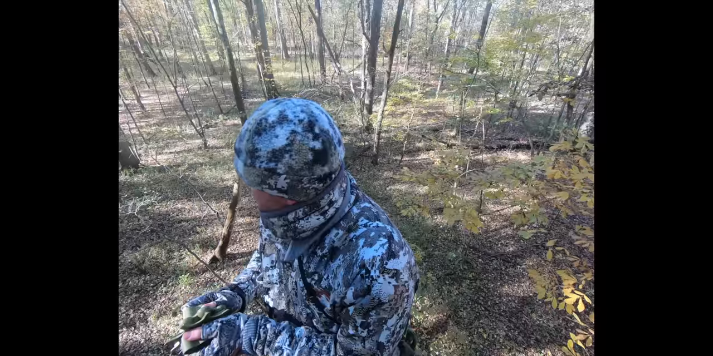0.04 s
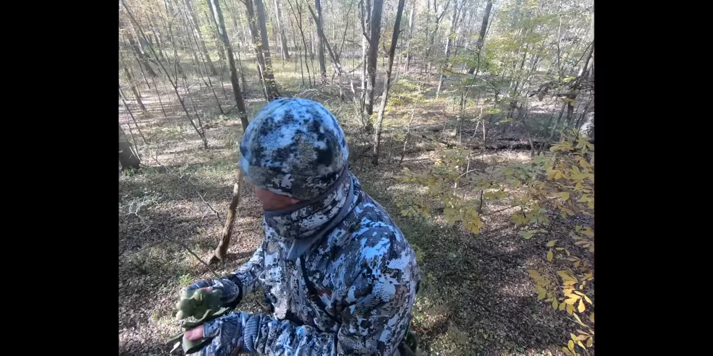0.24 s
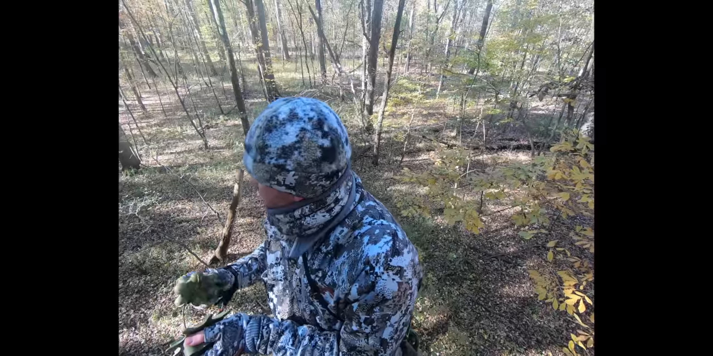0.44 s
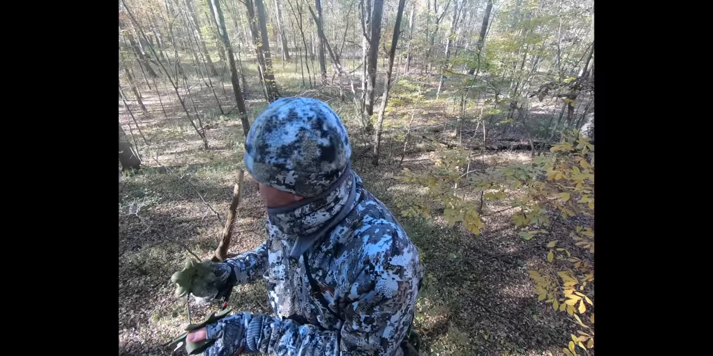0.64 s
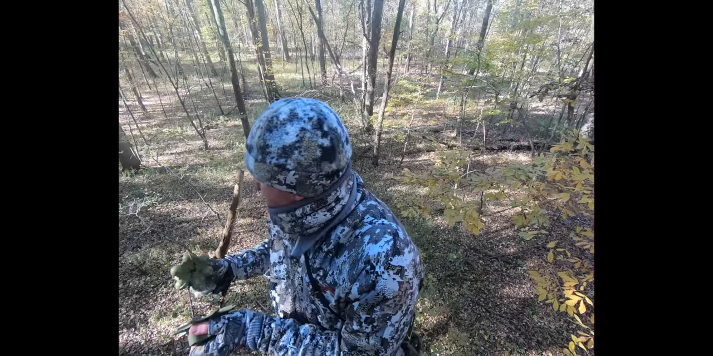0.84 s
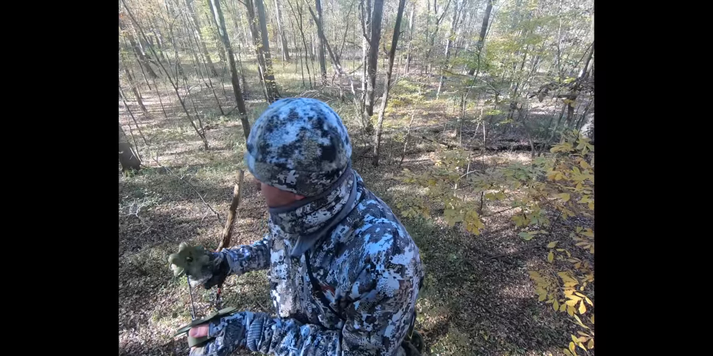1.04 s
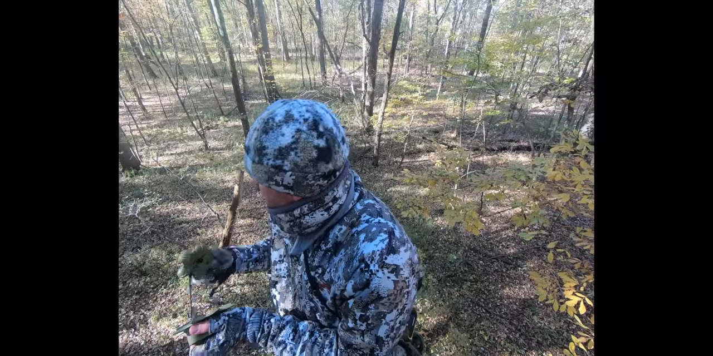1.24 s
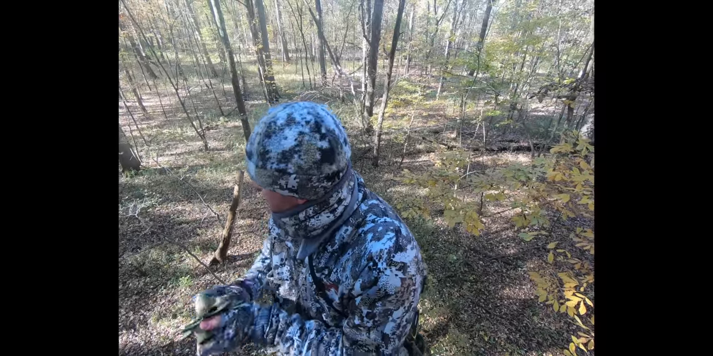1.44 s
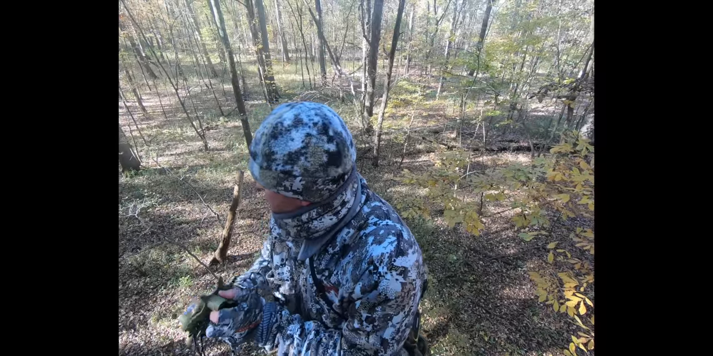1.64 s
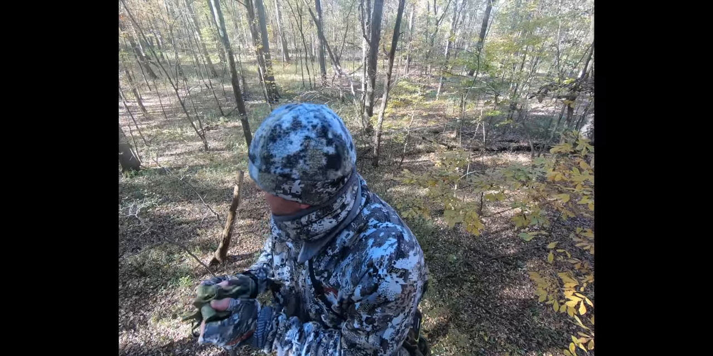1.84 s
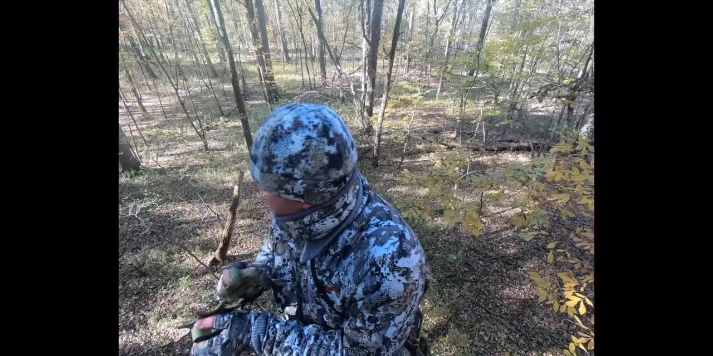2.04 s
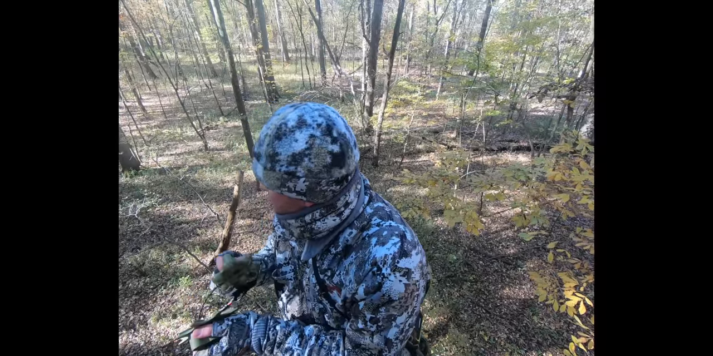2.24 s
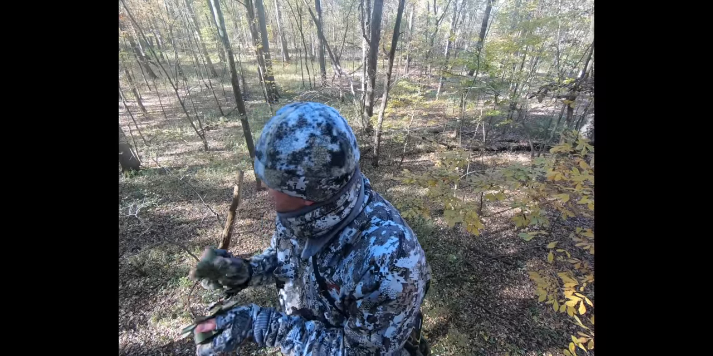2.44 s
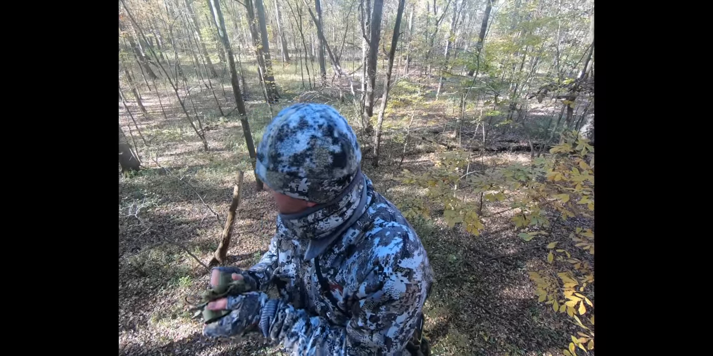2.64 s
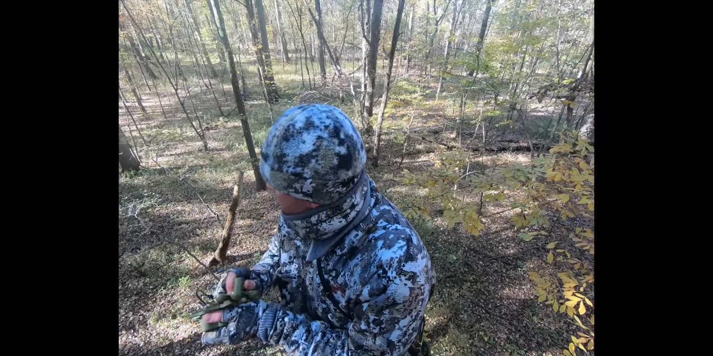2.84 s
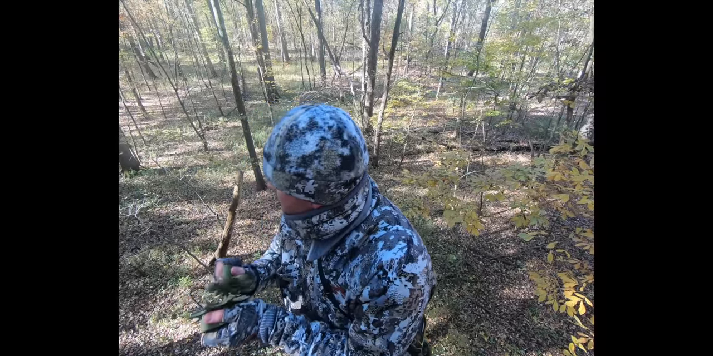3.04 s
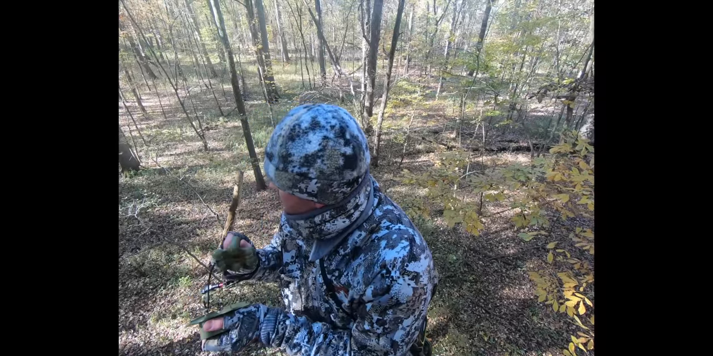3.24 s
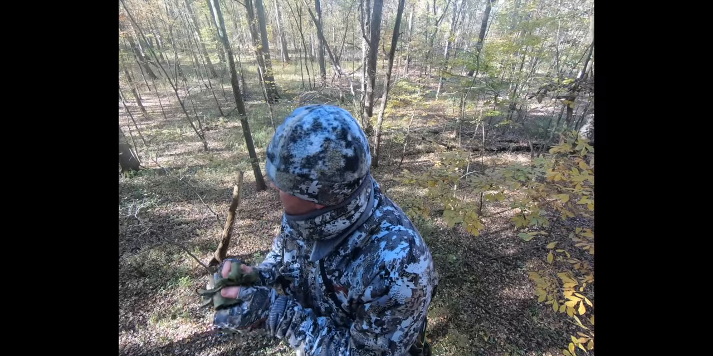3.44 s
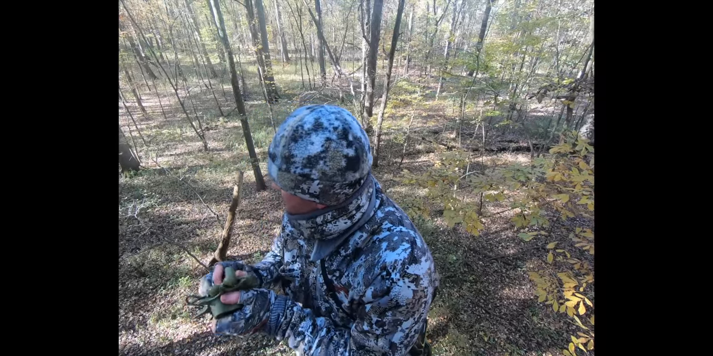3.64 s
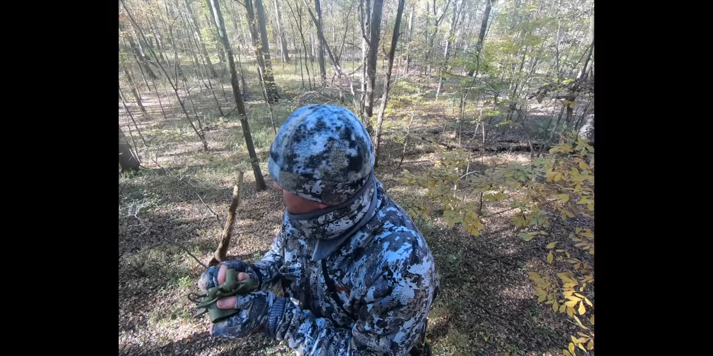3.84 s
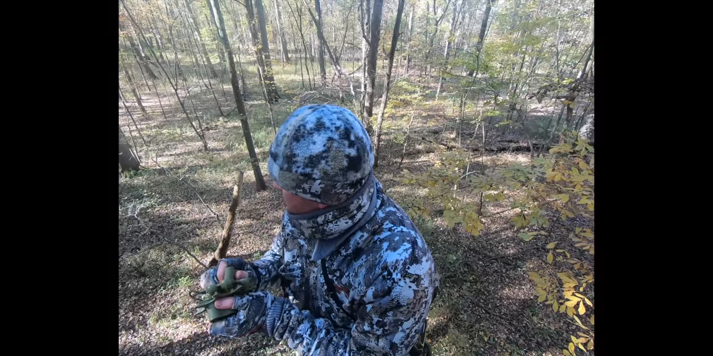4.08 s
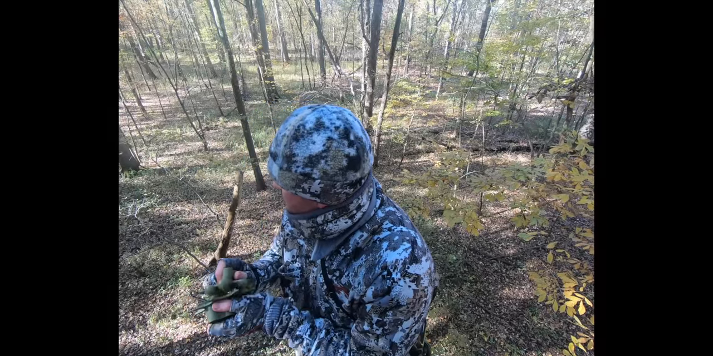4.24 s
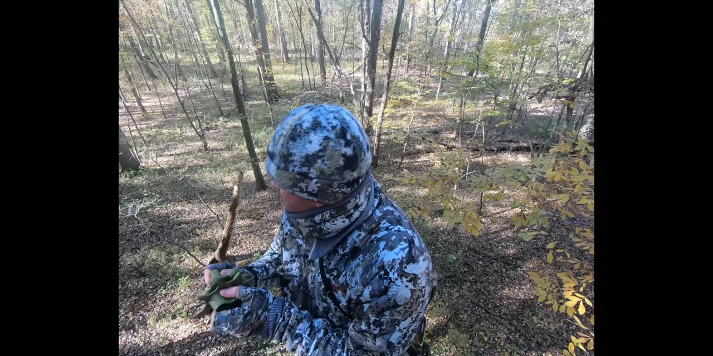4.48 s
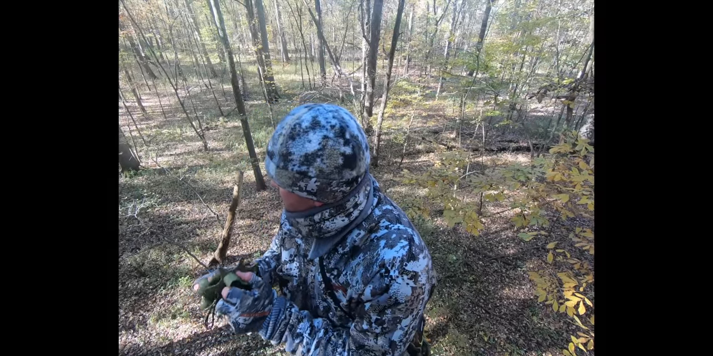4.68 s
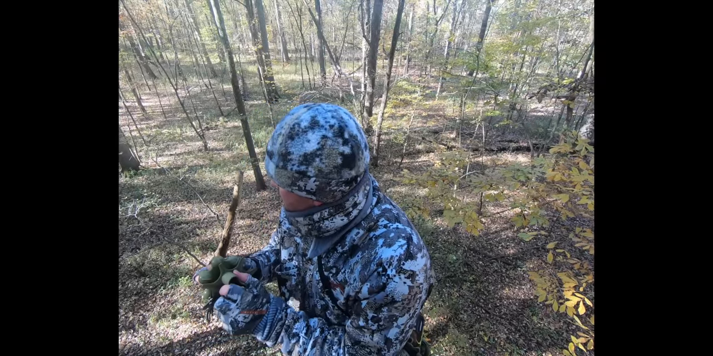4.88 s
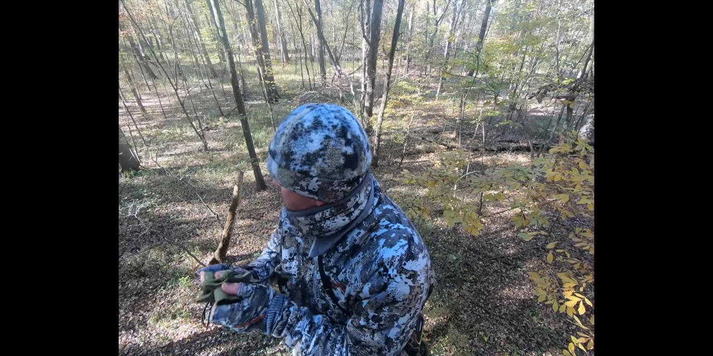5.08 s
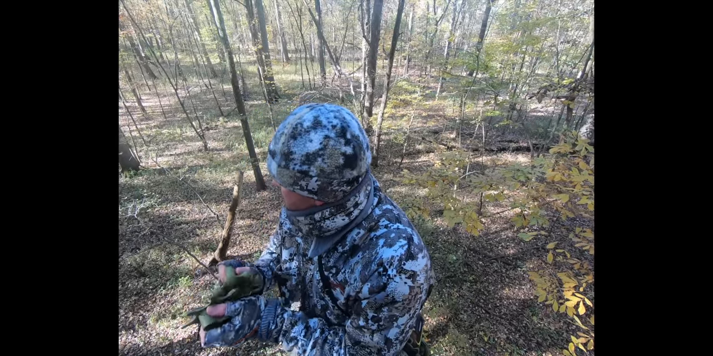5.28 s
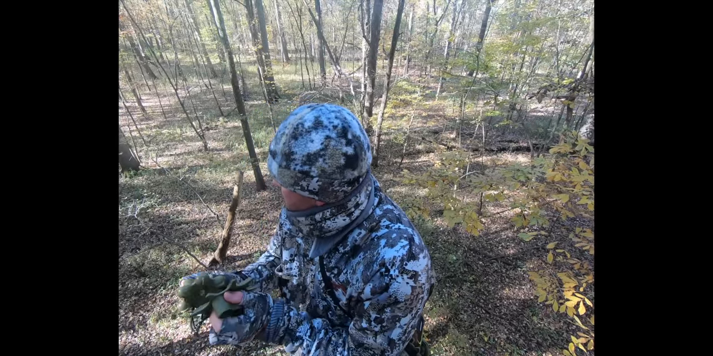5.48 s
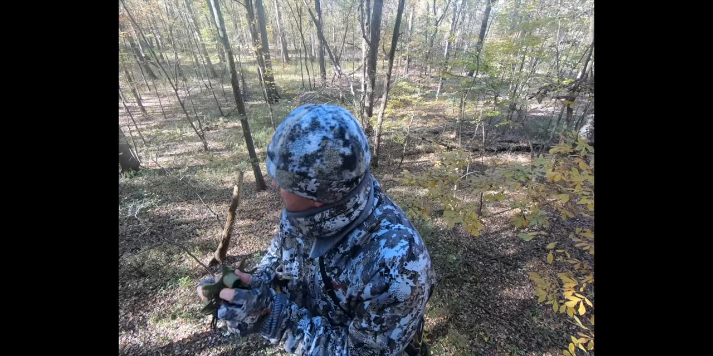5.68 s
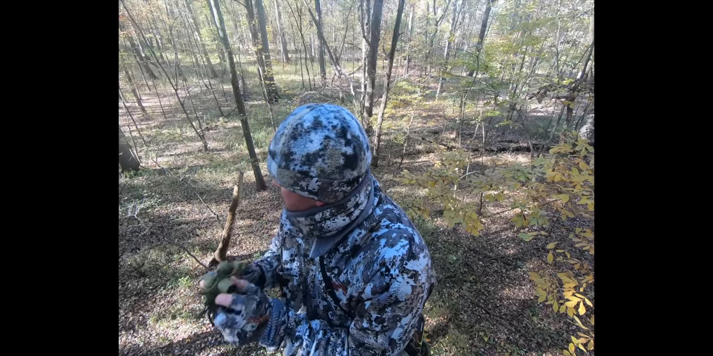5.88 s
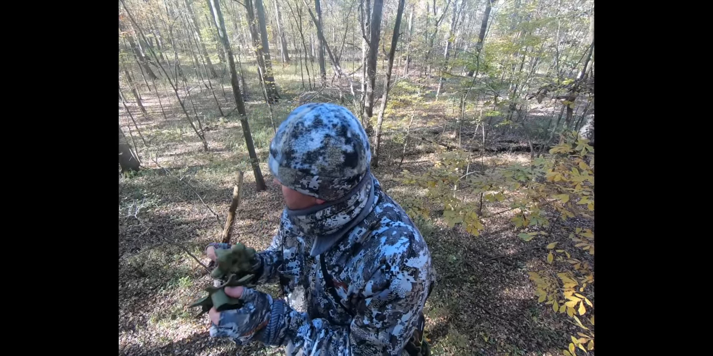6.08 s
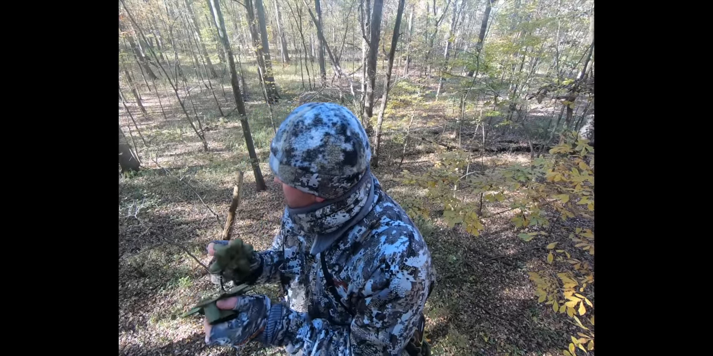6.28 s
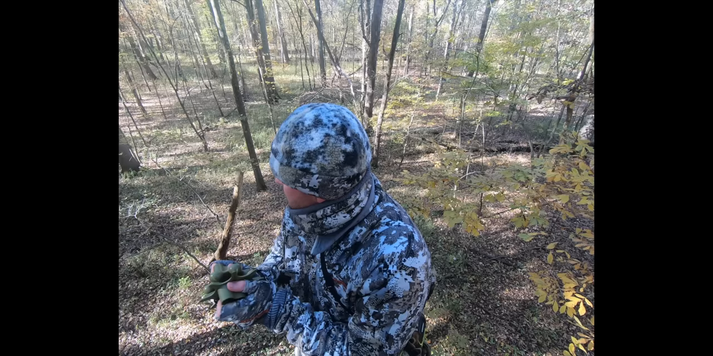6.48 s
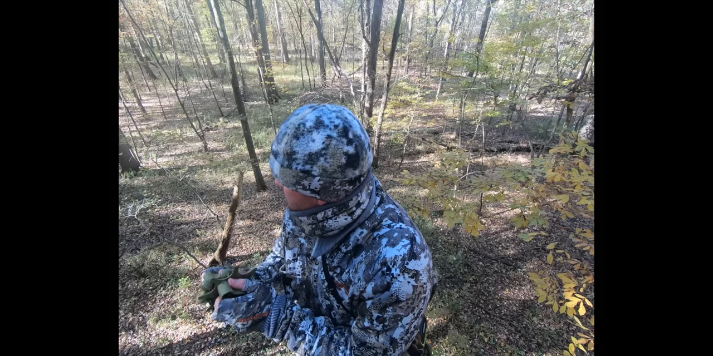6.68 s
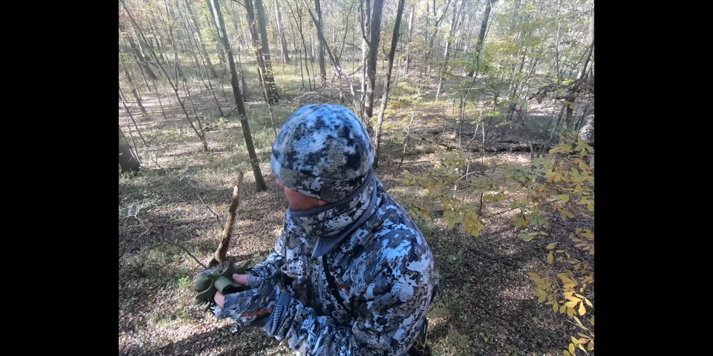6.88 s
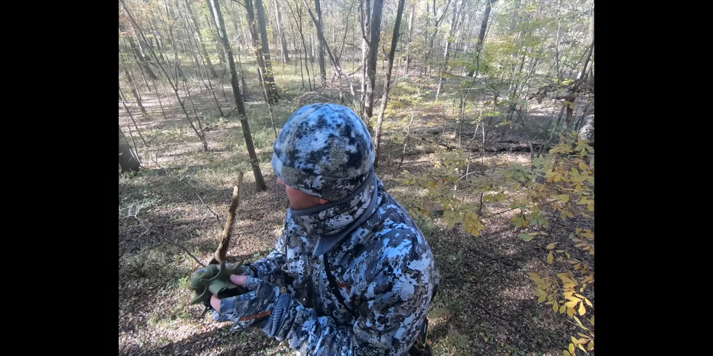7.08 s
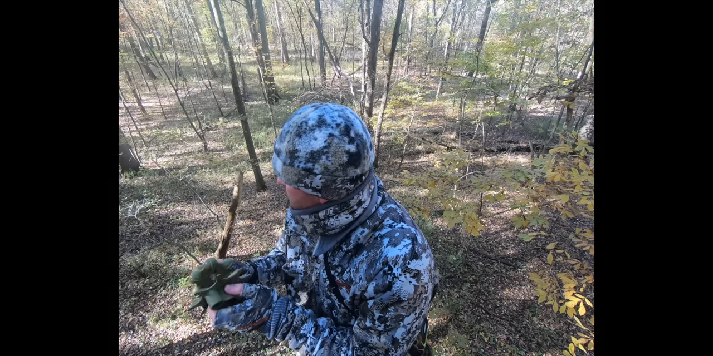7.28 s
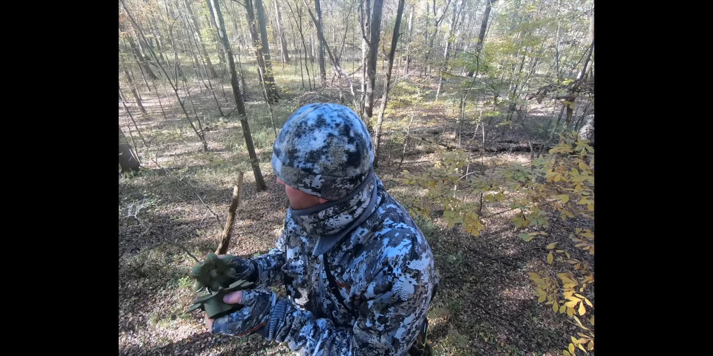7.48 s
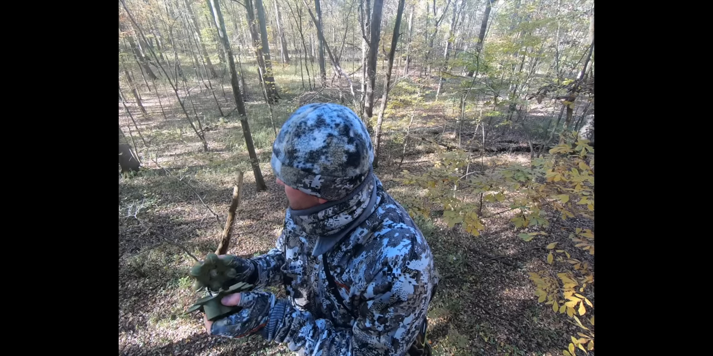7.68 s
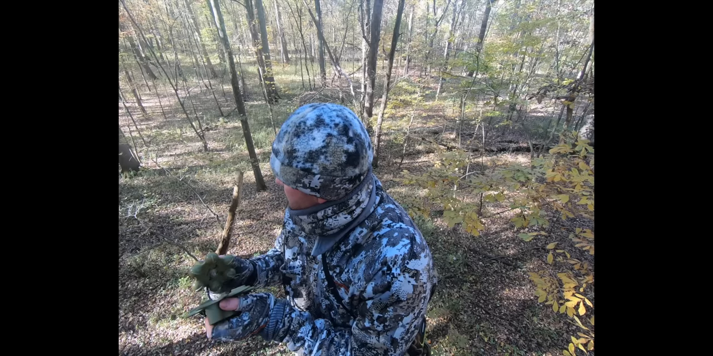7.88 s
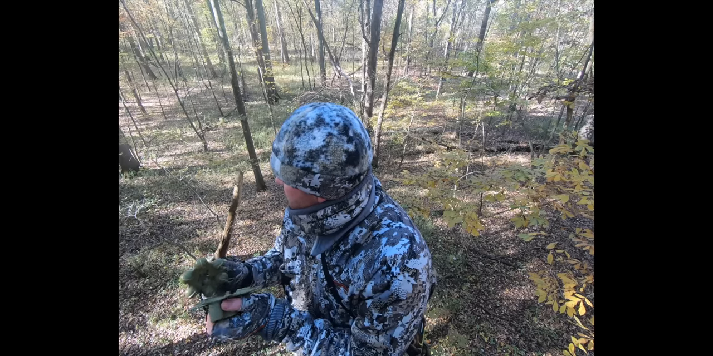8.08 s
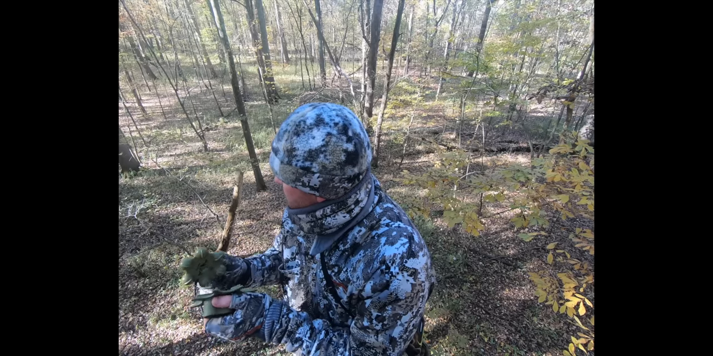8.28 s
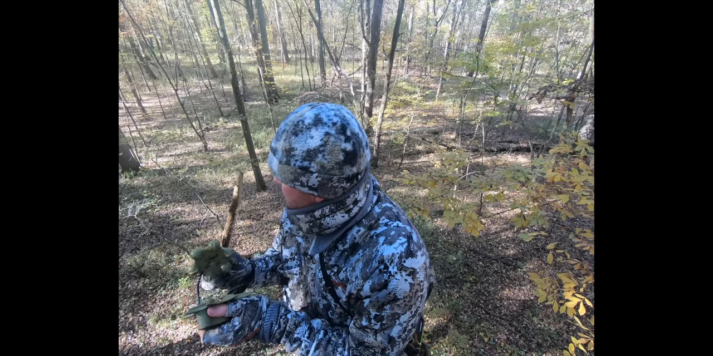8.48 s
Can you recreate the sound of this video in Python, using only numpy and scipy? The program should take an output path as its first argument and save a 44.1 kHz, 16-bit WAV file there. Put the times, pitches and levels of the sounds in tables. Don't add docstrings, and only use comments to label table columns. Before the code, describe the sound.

In a quiet wood, two antlers are knocked together by hand, close to a small stereo microphone. After near silence comes a sharp crack, then quick clusters of hard bony clacks, a denser grinding bout midway, and a few last knocks. Each rings briefly and dry, with a dull tail scattered back by the trees. Thin birds lisp overhead and traffic hums far away.

```python
import sys
import numpy as np
from scipy import signal
from scipy.fft import rfft, irfft
from scipy.io import wavfile
from scipy.ndimage import uniform_filter1d, minimum_filter1d

SR = 44100
rng = np.random.default_rng(int(sys.argv[2]) if len(sys.argv) > 2 else 0)


def store_pcm(level_fs):
    pcm = np.round(np.clip(level_fs, -1, 1) * 32767).astype(np.int16)
    wavfile.write(sys.argv[1], SR, np.atleast_2d(pcm).T)


def volts(x):
    e = np.asarray(x, float) / 20
    return 10 ** e


N = 375732


def rms_one(x):
    return x / np.sqrt(np.mean(x ** 2) + 1e-20)


def at_hz(points, hz):
    points = np.array(points, float)
    return np.interp(np.log(hz), np.log(points[:, 0] + 1), points[:, 1])


def drift(rate_hz):
    r = np.exp(-80 * np.pi * rate_hz / SR)
    slow = signal.lfilter([1], [1, -2 * r, r * r], rng.standard_normal(N // 40 + 2002))[2000:]
    return np.interp(np.arange(N) / 40, np.arange(len(slow)), rms_one(slow))


def band(x, low_hz, high_hz):
    return signal.sosfilt(signal.butter(2, [low_hz, high_hz], "band", fs=SR, output="sos"), x)


def pair(alike, size=N):
    mid, side = rng.standard_normal((2, size))
    alike = np.clip(alike, -1, 1)
    return (np.sqrt(1 + alike) * mid + np.sqrt(1 - alike) * side * [[1], [-1]]) / np.sqrt(2)


# frequency in Hz, level in dB per Hz.
TRAFFIC_SPECTRUM = [(65, -40), (110, -12), (135, -5.5), (156, -4.5), (188, 1.5), (220, -2), (253, -5.5),
                    (276, -3), (312, -3.5), (481, -21), (823, -9.5), (1050, -25), (2500, -32.5),
                    (4430, -35.5), (6960, -42.5), (9050, -72), (15300, -120)]
# frequency in Hz, left-right likeness from -1 to 1.
TRAFFIC_LIKENESS = [(60, 0.36), (190, 0.56), (620, -0.043), (2020, -0.43), (6510, 0.0097)]
# centre in Hz, width in Hz, level in dB.
DRONES = [(158, 29, -70), (263, 13, -69), (346, 4.3, -76)]
TRAFFIC_DB = -61


def far_hum():
    traffic = 0
    edges = 110 * 2 ** np.arange(0, 7.2, .5)
    for low, high in zip(edges, edges[1:]):
        hz = np.sqrt(low * high)
        level = volts(at_hz(TRAFFIC_SPECTRUM, hz) + 0.73 * drift(5.5))
        traffic = traffic + level * band(pair(at_hz(TRAFFIC_LIKENESS, hz)), low, high)
    drones = 0
    for hz, width, db in DRONES:
        tone = rms_one(band(pair(1.0), hz - width / 2, hz + width / 2))
        drones = drones + volts(db + 0.5 * drift(4.5)) * tone
    traffic = signal.sosfilt(signal.butter(4, 120, "high", fs=SR, output="sos"), traffic)
    return volts(TRAFFIC_DB - 3.0) * rms_one(traffic) + drones


# time in seconds, rumble level in dB.
AIR_RUMBLE = [(0.0, -63.5), (1.78, -88.5), (1.92, -71.5), (2.75, -77), (5.58, -67.5), (6.59, -78),
              (7.83, -64), (8.52, -83)]
# start in seconds, peak in dB, swing frequency in Hz.
THUMPS = [
    (1.431, -43, 112),
    (1.93, -44, 93),
    (1.968, -41.5, 104),
    (2.0, -42.5, 70),
    (2.038, -53, 80),
    (4.857, -53, 89),
    (4.925, -44.5, 95),
    (4.995, -45.5, 96.9),
    (5.121, -50, 97),
    (5.639, -47, 98.5),
]
MURMUR_DB = -82.5


def lows():
    rumble = rms_one(band(band(pair(0.96), 25, 55), 15, 60))
    t = np.arange(N) / SR
    air = volts(np.interp(t, *np.transpose(AIR_RUMBLE)) + 1.4 * drift(4.7)) * rumble
    murmur = volts(MURMUR_DB + 1.8 * drift(3)) * rms_one(band(pair(0.18), 45, 100))
    swings = 0
    for s, peak_db, hz in THUMPS:
        late = np.maximum(t - s, 0) / 0.012
        swell = volts(peak_db) * late * np.exp(1 - late)
        swings = swings + swell * np.sin(2 * np.pi * hz * (t - s) * np.array([[1.3], [1]]))
    return air + murmur + swings * volts(np.array([[-8], [0]]))


# start in seconds, length in seconds, level in dB, first Hz, last Hz.
BIRD_NOTES = [(.01, 0.081, -84, 7770, 7700), (0.444, 0.3, -70.5, 7420, 7360),
              (0.693, 0.2, -74.5, 7730, 7550), (2.275, 0.32, -75, 7170, 7710),
              (3.151, 0.3, -74.5, 7320, 7630), (4.504, 0.29, -68, 7300, 7380),
              (5.439, 0.21, -76, 7170, 7280), (6.308, 0.18, -74, 7233, 7330),
              (7.415, 0.18, -70.5, 6970, 7480), (8.119, 0.03, -86.5, 7660, 7630),
              (8.301, 0.099, -85.5, 7670, 7570)]


def birds(trill_hz=45, swing_hz=260):
    t = np.arange(N) / SR
    beat = np.sin(np.pi * np.cumsum(trill_hz * (1 + 0.34 * drift(13))) / SR) ** 4
    trill = swing_hz * (2 * beat - .6) + 70 * drift(60)
    song = 0
    for s, length, level_db, first_hz, last_hz in BIRD_NOTES:
        done = (t - s) / length
        on = np.clip(np.minimum(done / 0.087, (1 - done) / 1.1), 0, 1)
        glide_hz = first_hz + (last_hz - first_hz) * np.clip(done, 0, 1)
        phase = 2 * np.pi * np.cumsum(glide_hz + trill) / SR
        song = song + on * volts(level_db) * np.sin(phase)
    song = song * volts(2.1 * drift(30) - 11.0 * trill / swing_hz)
    tail = pair(0.192, size=SR // 2) * volts(-28 - 60 * t[:SR // 2] / 0.4)
    direct = song * volts(np.array([[-3], [-1.5]]))
    return direct + signal.fftconvolve(song[None], tail, axes=1)[:, :N]


# centre in seconds, width in seconds, level in dB.
SLEEVE = [
    (.09, 0.057, -77),
    (.385, 0.037, -81),
    (4.603, 0.012, -54),
    (4.96, .012, -53),
]
HISS_DB = -92.5


def rustles():
    t = np.arange(N) / SR
    brush = sum(volts(db) * np.exp(-((t - s) / width) ** 2) for s, width, db in SLEEVE)
    cloth = brush * volts(3.9 * drift(40)) * rms_one(band(pair(0.7), 740, 4400))
    return cloth + volts(HISS_DB) * rms_one(band(pair(0), 5000, 9300))


def stutter(peak_db, ring_db, size, ahead, rise_s=0.0012, stutter_s=.002, drag=0.15):
    count = len(peak_db)
    peak_db = peak_db[:, None]
    draw = rng.random((count, 2, 48))
    length = stutter_s * volts(.4 * ring_db[:, None] - 2.5 - .1 * np.maximum(peak_db + 15, 0))
    when = 6 * length * draw[:, 0] ** 1.3
    swell = np.minimum(when / (rise_s * volts(0.65 * (peak_db + 6.5))) + 0.17, 1)
    fade = np.exp(-when / length) + drag * (peak_db < SQUEEZED_ABOVE_DB)
    force = (2 * draw[:, 1] - 1) ** 3 * swell * fade
    contacts = np.zeros((count, size))
    place = np.minimum(when * SR + ahead, size - 1).astype(int)
    np.add.at(contacts, (np.arange(count)[:, None], place), force)
    return contacts


def struck(modes, contacts, grip):
    hz, level_db, t60 = np.transpose(modes)[:, None, :, None]
    t = np.arange(contacts.shape[1]) / SR
    chance = rng.standard_normal((len(contacts), 2, len(modes), 1))
    decay = volts(level_db + 2.8 * chance[:, 0] - 60 * t / (t60 * grip))
    tuned_hz = hz * (1 + 0.018 * chance[:, 1])
    modes_sum = np.sum(decay * np.sin(2 * np.pi * tuned_hz * t), axis=1)
    rings = signal.fftconvolve(modes_sum, contacts, axes=1)[:, :len(t)]
    rings = band(rings, 0.88 * hz.min(), 0.97 * hz.max())
    return rings / np.linalg.norm(rings, axis=1)[:, None]


def all_round(modes):
    hz, level_db, t60 = np.transpose(modes)[:, :, None]
    t = np.arange(600) / SR
    ring = np.sum(volts(level_db - 60 * t / (.38 * t60)) * np.sin(2 * np.pi * hz * t), axis=0)
    ring = band(ring, 0.81 * hz.min(), 1.084 * hz.max())
    return ring / np.linalg.norm(ring)


# dB for a middling knock, dB per dB of strength,
# dB per dB toward the tips.
FAMILY_SHARES = [(-15.5, 0.4875, 0.16), (-5, 0.58, -0.16), (-3.5, 0.7052, 0.395), (-13, 0.8049, 1.14)]


def shares(peak_db, tipward_db, beam_db):
    mean_db, by_strength, by_place = np.transpose(FAMILY_SHARES)[:, :, None]
    weight = volts(mean_db + by_strength * (peak_db + 16.5) + by_place * tipward_db)
    weight[0] *= volts(beam_db)
    return weight / np.linalg.norm(weight, axis=0)


# blow in seconds, mode in Hz, dB above usual.
FAVOURED_MODES = [(1.0456, 2683, 10.5), (1.0456, 4830, 11.0), (1.411, 1328, 9), (1.411, 2063, 5),
                  (1.411, 5696, 6.5), (1.411, 7216, 11.5), (1.6574, 5263, 12.5), (1.7044, 2252, 6),
                  (1.7109, 4532, 11), (1.7221, 2152, 0), (1.9177, 2670, 7), (1.9257, 5370, 14),
                  (1.9669, 2154, 6.0), (1.9669, 3622, 5.0), (2.5722, 3438, 9.5), (2.5722, 6580, 9.5),
                  (2.5788, 3677, 7.5), (2.5788, 9030, 18), (2.8752, 3550, 8), (2.9769, 4140, 8.0),
                  (2.9898, 4620, 11.0), (2.9961, 1195, 9), (2.9961, 2174, 4.5), (3.0116, 2160, 7.5),
                  (3.0116, 3190, 6), (3.442, 790, 9.5), (3.442, 2216, 8), (3.442, 4050, 8.5),
                  (4.4096, 2270, 9.0), (4.7152, 2108, 6.5), (4.7239, 2310, 7.5), (4.7645, 3240, 8),
                  (4.8152, 3270, 6.5), (4.836, 4630, 6.5), (4.8768, 3314, 6.5), (4.8945, 1040, 9),
                  (4.9862, 2463, 8.0), (4.9945, 3374, 9.5), (5.1048, 2510, 6), (5.1254, 3215, 7.0),
                  (5.1374, 3250, 4.5), (5.1917, 3210, 11), (5.2873, 3240, 5), (5.3205, 2260, 5),
                  (5.3384, 4673, 7.5), (5.6277, 985, 7), (5.6277, 2056, 5), (5.6277, 2666, 6),
                  (5.9377, 3120, 4.5), (5.964, 3480, 10), (5.9698, 2920, 5.5), (5.9698, 3690, 11),
                  (5.9864, 2604, 6.5), (6.5504, 2674, 6.5), (6.5504, 3212, 7), (6.5621, 5200, 11),
                  (6.5684, 3520, 8.5), (6.6144, 2310, 8), (6.7378, 3330, 4.5), (6.9189, 3350, 10.5)]


def favour(s, hz, width_hz=140):
    gain = np.ones((len(s), len(hz)), complex)
    for when, mode_hz, level_db in FAVOURED_MODES:
        resonance = (volts(level_db) - 1) / (1 + 1j * (hz - mode_hz) / width_hz)
        gain[np.abs(s - when) < .003] *= 1 + resonance
    return gain


# frequency in Hz, left minus right in dB.
PORT_LEVEL = [(500, -2), (1000, 0), (1700, 9), (2200, 2.5), (3000, 0), (5500, -2.5), (7000, 2), (7900, -6),
              (9000, 0)]
# frequency in Hz, radians by which left leads.
PORT_LEAD = [(500, 0), (1600, 1.1), (1900, -.7), (2500, -.1), (4800, .9), (6700, 1.1), (7500, 0), (8300, 2),
             (10000, 1)]


def ports(knocks):
    size = knocks.shape[1]
    hz = np.arange(size // 2 + 1) * SR / size + 1
    shift = rng.standard_normal((len(knocks), 2, 1))
    seen_hz = hz * (1 + .04 * shift[:, 0])
    lead = at_hz(PORT_LEAD, seen_hz) + 0.4 * shift[:, 1] * hz / 8000
    half = volts(at_hz(PORT_LEVEL, seen_hz) / 2) * np.exp(.5j * lead)
    gain = np.array([half, 1 / half])
    gain = gain / np.sqrt(np.mean(np.abs(gain) ** 2, axis=0))
    return irfft(rfft(knocks) * gain, size)


# frequency in Hz, level in dB, t60 in seconds.
BEAM = [(336.3, -25.5, 0.065), (613, -11.5, 0.003), (850, -9, 0.042), (965, -1, 0.02), (1267, 21, 0.021),
        (1419.6, 16.5, 0.037)]
# frequency in Hz, level in dB, t60 in seconds.
MAIN = [(1920, -6, 0.0091), (2173.6, 6, 0.0076), (2170, 12, 0.012), (2660, -3, 0.033)]
# frequency in Hz, level in dB, t60 in seconds.
TINE = [(2790, -4.5, 0.007), (3294, 3, 0.016), (3636, 2, 0.015), (4046, -2.5, 0.012)]
# frequency in Hz, level in dB, t60 in seconds.
TIP = [(4670, 6, 0.021), (4885, -2.5, 0.021), (5274, 5, 0.0093), (5720, 5, 0.013), (6584, -8.5, 0.012),
       (6510, -9.5, 0.0065), (8950, -10, 0.012), (10100, -24, 0.003), (12100, -25.5, 0.0063)]
BEAM_SCATTER_DB = 1.5
CONTACT_HZ, DULLER_PER_DB = 8600, 0.1788
HANDS_CLOSE_S = 0.01
SQUEEZED_ABOVE_DB, SQUEEZE = -13, 0.64
OWN_COLOUR = .25


def antlers(clashes, touches, light):
    detailed = clashes + touches
    s, peak_db, tipward_db = np.transpose([row[:3] for row in detailed] + light)
    beam_db = np.r_[[row[3] for row in detailed], BEAM_SCATTER_DB * rng.standard_normal(len(light))]
    count, size, ahead = len(s), 1280, 100
    ring_db = 1.4 * rng.standard_normal(count)
    ring_db[:len(clashes)] = np.transpose(clashes)[4]
    contacts = stutter(peak_db, ring_db, size, ahead)
    grip = volts(ring_db - 1.0 - 0.069 * (peak_db + 16.0))[:, None, None]
    families = list(zip(shares(peak_db, tipward_db, beam_db), [BEAM, MAIN, TINE, TIP]))
    knocks = sum(share[:, None] * struck(modes, contacts, grip) for share, modes in families)
    knocks = knocks * volts(-6.0 * ((np.arange(size) - ahead) / SR / HANDS_CLOSE_S) ** 3)
    cut_hz = CONTACT_HZ * volts(DULLER_PER_DB * (peak_db[:, None] + 6))
    hz = np.arange(size // 2 + 1) * SR / size
    bare = irfft(rfft(knocks) * favour(s, hz) / (1 + 1j * hz / cut_hz) ** 2, size)
    heard = ports(bare)

    power = uniform_filter1d(2 * heard.mean(axis=0) ** 2, size=70, mode="constant")
    strength = volts(peak_db - 1.24) / np.sqrt(power.max(axis=1))
    far = strength * volts(SQUEEZE * np.maximum(peak_db - SQUEEZED_ABOVE_DB, 0))
    layers = np.r_[heard * strength[:, None], bare[None] * far[:, None]]
    placed = np.zeros((3, N + size))
    peak_at = (s * SR).astype(int)
    for start, knock in zip(peak_at - power.argmax(axis=1), layers.swapaxes(0, 1)):
        placed[:, start:start + size] += knock

    radiated, blows = np.zeros(N), np.zeros(N)
    for share, modes in families:
        blows[peak_at] = share * far
        radiated += signal.fftconvolve(blows, all_round(modes))[:N]
    radiated = np.sqrt(1 - OWN_COLOUR) * radiated + OWN_COLOUR * 2.1 * placed[2, :N]
    return placed[:2, :N], radiated


# frequency in Hz, t60 in seconds.
WOOD_T60 = [(500, 0.99), (1200, 0.85), (2200, 1.59), (3400, 0.9), (5700, 1.1), (7500, 0.36), (9000, 0.4),
            (12000, .3)]
# frequency in Hz, dB scattered back.
WOOD_LEVEL = [(500, -7), (1200, -2), (2200, -2.5), (3600, -8.5), (5700, -8), (7500, 2), (9300, -3.5),
              (10800, -24.5)]
# frequency in Hz, left-right likeness from -1 to 1.
WOOD_LIKENESS = [(700, 0), (1200, -.5), (1700, 0), (2500, .4), (4000, .65), (5200, 0)]


def wood(x):
    t = np.arange(2 * SR) / SR
    edges = 400 * 2 ** np.arange(0, 4.7, 1 / 3)
    answer = 0
    for low, high in zip(edges, edges[1:]):
        hz = np.sqrt(low * high)
        fade = volts(at_hz(WOOD_LEVEL, hz) - 60 * np.maximum(t - .09, 0) / at_hz(WOOD_T60, hz))
        build_s = 0.038 * (hz / 3000) ** 0.16
        fade = fade * np.clip((t - .019) / build_s, 0, 1) ** .4
        answer = answer + fade * band(pair(at_hz(WOOD_LIKENESS, hz), size=len(t)), low, high)
    answer = signal.sosfilt(signal.butter(14, 10200, fs=SR, output="sos"), answer)
    return volts(-59.5) * signal.fftconvolve(x[None], answer, axes=1)[:, :N]


SNAP_TIMES = [
    1.4099,
    2.5788,
    1.0448,
    4.4085,
    4.555,
]
SNAP_LEVELS = [
    -36,
    -52,
    -66,
    -64,
    -62,
]
SNAP_T60_S = .008


def snaps():
    t = np.arange(N) / SR
    burst = 0
    for s, db in zip(SNAP_TIMES, SNAP_LEVELS):
        burst = burst + volts(db - 60 * np.maximum(t - s, 0) / SNAP_T60_S) * (t >= s)
    crack = 3 * band(burst * rng.standard_normal(N), 8500, 15000)
    return np.array([np.roll(crack, 1), crack])


# first second, last second, level in dB.
SCRAPES = [
    (2.93, 3.03, -35),
    (4.651, 4.755, -37.5),
    (4.795, 4.932, -34),
    (4.953, 5.0, -37.5),
    (5.095, 5.148, -32),
    (5.184, 5.21, -31.5),
    (5.919, 6.01, -34),
]
TICKS_PER_S = 160


def scrape_ticks():
    rows = []
    for first, last, level_db in SCRAPES:
        draw = rng.random((40, 3))
        s = first + np.cumsum(-np.log(1 - draw[:, 0])) / TICKS_PER_S
        peak_db = level_db - 5.0 + 12 * (draw[:, 1] - .5)
        tipward_db = 14 * (draw[:, 2] - .5)
        rows += [row for row in zip(s, peak_db, tipward_db) if row[0] < last]
    return rows


# peak time in seconds, peak in dB, struck toward the tips in dB,
# extra beam sound in dB, ring length in dB.
CLASHES = [(1.4112, -0.5, 5, -3, -0.5), (1.704, -10.5, -3.5, -3, -0.5), (1.7112, -12.5, 7.5, -1.5, -0.5),
           (1.9176, -7.5, 1, -1, 1.5), (1.9258, -11, 1, -3, 1.5), (1.9678, -9, 0, -10.5, 0),
           (2.5725, -8, 7.5, -5, -3), (2.5785, -1, 4.5, -3.5, -0.5), (2.9768, -11, 3, -9, -1),
           (2.9966, -10.5, 4.5, 0.5, -2), (3.4417, -3.5, 5.5, -6, -1.5), (4.4106, -11, -6.5, 0, 1),
           (4.8149, -11, 3.5, -0.5, 2), (4.8943, -13.5, 1, -5.5, -1), (4.987, -8, 5.5, 0.5, 1.5),
           (4.9925, -13.5, 1, -15.5, -2.5), (5.1383, -11.5, -1, -2.5, -1.5), (5.1927, -13, 2.5, -6.5, -0.5),
           (5.3203, -16, 0, -8.5, -3), (5.6277, -4, -1, -11, -1), (5.9317, -11, -1.5, -3, -0.5),
           (5.9378, -13.5, 1.5, -15, 0), (5.97, -9, -4, -20.5, -0.5), (5.986, -10.5, 2.5, -14, 1.5),
           (6.5514, -6, -7.5, -13, -3.5), (6.5543, -8.5, 3.5, -4.5, 0.5), (6.5618, -9, 3.5, -12.5, 1.5),
           (6.615, -11, 3.5, -1, 0.5)]
FURTHER_KNOCKS = [(1.4252, -32, 2, 1, -2), (1.9212, -13, -5, -1, 0), (1.9292, -17.5, -6, -6, -0.5),
                  (1.9648, -15, 3, -6, -3), (1.9699, -12.5, 2.5, -4, -0.5), (2.5802, -12, 6, -3.5, -4),
                  (2.9402, -21.5, 2.5, -4.5, -3), (2.9728, -21, 7, 5, 2), (2.9808, -18.5, -10, -1, 0),
                  (2.9925, -22, 10, -10, -4), (3.0008, -14, -1, -10, 0), (3.0118, -11.5, -5.5, -3.5, -1),
                  (4.8188, -18, 3.5, -8, 1), (4.9944, -10.5, 3.5, -5.5, -1), (5.0995, -33, -10, 3, -1),
                  (5.1085, -16, 7, 6, 1), (5.1118, -24, 4, -2, 1.5), (5.1962, -19.5, 8, 0, 0),
                  (5.2042, -21.5, 6, 5, -0.5), (5.6258, -11.5, 0, -4.5, -2.5), (5.6372, -30, 1, 1, 0.5),
                  (5.9408, -24.5, -8, 6, -2), (5.9745, -21.5, 6, 1, 0.5), (4.8722, -31, 0, 9.5, -0.5),
                  (1.0422, -48, 14, -13, 0), (1.062, -56, 19, -8, 0), (2.5755, -15, 7, -11, 0),
                  (3.4437, -8, -5, -5, 0), (4.6558, -23.5, -0.5, 0.5, 0), (4.6875, -27, 8, 6, -2.5),
                  (4.7455, -23.5, 7, 0.5, -0.5), (4.8805, -30, 2, 6, -4), (4.923, -28.5, 3, 4, -0.5),
                  (5.9655, -15.5, 4, -7, -1.5), (4.8022, -21, -2, -1, 1), (5.2975, -30, 2, -2, 1)]
TOUCHES = [
    (1.081, -54, -9, 15),
    (2.101, -34.5, -2, 17.5),
    (3.554, -41, -7.5, 10),
    (3.7225, -36.5, 6, 0),
    (4.4059, -17, 11.5, -4.5),
    (5.56, -51.5, 12.5, -11.5),
    (5.708, -40, 5.5, 4.5),
    (6.445, -58, 11.5, -6),
    (5.83, -35, -1.5, 27),
    (7.92, -71.5, 16.5, -2.5),
]
# peak time in seconds, peak in dB, struck toward the tips in dB.
FIRST_BOUT = [(0.6472, -62, 17), (1.0453, -36.5, 17.5), (1.0845, -66, -11), (1.4006, -25.5, 6),
              (1.4282, -29.5, 6.5), (1.5051, -38.5, -4.5), (1.6563, -21, 8), (1.6676, -31.5, -7),
              (1.6825, -28, 17), (1.6948, -26, 13), (1.7188, -13, 4), (1.7234, -13.5, -2.5),
              (1.7318, -24, -2), (1.753, -31.5, 3.5), (1.7659, -22, 3), (1.7941, -31.5, 5),
              (1.8078, -36.5, 1.5), (1.9141, -18.5, 0.5), (1.9374, -28.5, -2), (1.9523, -26.5, 9),
              (1.9577, -28, 0), (1.9824, -16.5, 3.5), (1.9933, -27.5, -5.5), (2.0967, -41, 4.5),
              (2.1031, -32.5, 14.5), (2.3917, -57, 12), (2.5002, -57.5, 11.5)]
SECOND_BOUT = [(2.5865, -26, 8), (2.5972, -28, -24), (2.6345, -40, 0), (2.791, -32, 1.5), (2.8192, -31, -9),
               (2.8402, -21.5, -14), (2.8753, -16.5, 1), (2.8972, -23.5, 3), (2.9283, -37, 5),
               (2.936, -25, -3.5), (2.9524, -18, 3), (2.9588, -19, -12.5), (2.9897, -15.5, 9),
               (3.0103, -15, -5.5), (3.0173, -25, -19), (3.0395, -19, 5), (3.058, -27.5, 0),
               (3.0765, -30.5, 0.5), (3.0975, -36, 5), (3.2509, -49.5, 13.5), (3.7283, -30, -5),
               (3.744, -45, -21), (3.7857, -35.5, -12.5), (3.8091, -44.5, -2), (3.8751, -47, -3),
               (4.1892, -50.5, -13.5)]
GRIND_START = [(4.2924, -46.5, -17), (4.3407, -38.5, -1), (4.3907, -21.5, 2), (4.5017, -30, 3),
               (4.5276, -32, -9), (4.541, -31, 14.5), (4.5556, -21, 11), (4.605, -51, 13),
               (4.6383, -22, -10.5), (4.65, -19, 4.5), (4.6583, -23.5, 0.5), (4.685, -20, 3.5),
               (4.7, -18, 3.5), (4.7112, -14.5, -6), (4.7149, -13.5, 4), (4.7244, -16, -4.5),
               (4.7415, -23.5, -2.5), (4.7645, -26, 10.5), (4.7833, -20.5, 2.5), (4.8025, -27.5, -4.5),
               (4.8067, -27.5, -7), (4.8294, -16.5, -4), (4.8362, -14, 6.5), (4.845, -31, 10.5),
               (4.8556, -28, 0), (4.877, -18, 0.5), (4.9102, -32.5, -1.5), (4.9178, -26, 8.5)]
GRIND_END = [(4.969, -19.5, 7.5), (4.9807, -18.5, 3), (5.048, -33.5, -9), (5.0767, -37.5, -12),
             (5.0849, -20, 3), (5.1056, -14, 6.5), (5.121, -13.5, -2.5), (5.1245, -14.5, 5.5),
             (5.1304, -19, -1.5), (5.1689, -24.5, -6), (5.188, -27, 0), (5.2009, -16.5, 4),
             (5.2616, -31, -5), (5.272, -38, -3.5), (5.2878, -15, -1.5), (5.339, -15, 7),
             (5.3553, -19.5, -4.5), (5.3767, -24, -1), (5.4172, -45, 7.5)]
LAST_BOUT = [(5.6994, -34, 2), (5.7725, -39, -1), (5.8095, -21.5, -4.5), (5.8202, -27, -5),
             (5.8365, -23, 3.5), (5.9642, -14.5, 2), (6.0012, -20, 7.5), (6.5678, -16, -3.5),
             (6.5765, -24, -14), (6.5858, -30.5, 6), (6.5987, -28.5, 8.5), (6.6093, -26, -8),
             (6.6464, -34.5, 3), (6.738, -27, 4), (6.7616, -27, -7), (6.7777, -32.5, -8),
             (6.9186, -33.5, 4), (8.4174, -54, 12)]


def scene():
    light = FIRST_BOUT + SECOND_BOUT + GRIND_START + GRIND_END + LAST_BOUT + scrape_ticks()
    near, radiated = antlers(CLASHES, TOUCHES, light)
    background = wood(radiated) + birds() + rustles() + far_hum() + lows()
    further = antlers(FURTHER_KNOCKS, [], [])[0]
    return near + background + further + snaps()


def top_cut(x):
    return signal.sosfilt(signal.butter(12, 15900, fs=SR, output="sos"), x)


# seconds ahead, level in dB.
FORE_ECHO = [
    (0.0102, -27),
    (.021, -39),
    (.0315, -53),
]
SMEAR_S, SMEAR_DB = 0.066, -44


def record(dry):
    room = minimum_filter1d(1 / np.maximum(np.abs(dry).max(axis=0), 1), size=160)
    dry = dry * uniform_filter1d(room, size=80)
    loudness = np.minimum(uniform_filter1d(np.abs(dry), size=120, axis=1) / 0.25, 1) ** 1.5
    ghost = band(np.diff(dry * loudness, prepend=0), 900, 9000) * 1.8
    wet = dry + sum(volts(db) * np.roll(ghost, -int(s * SR), axis=1) for s, db in FORE_ECHO)
    ahead = np.arange(3600) / SR
    smear = rng.standard_normal((1, len(ahead))) * volts(SMEAR_DB - 10 - 30 * ahead / SMEAR_S)
    lead_in = signal.fftconvolve(ghost[:, ::-1], smear, axes=1)[:, :N][:, ::-1]
    return top_cut(np.clip(wet + lead_in, -1, 1))


dry = scene()
out = record(dry)
store_pcm(out)
```